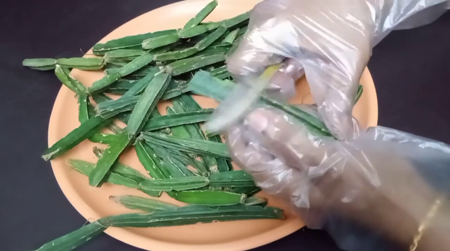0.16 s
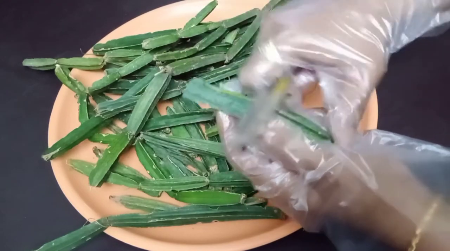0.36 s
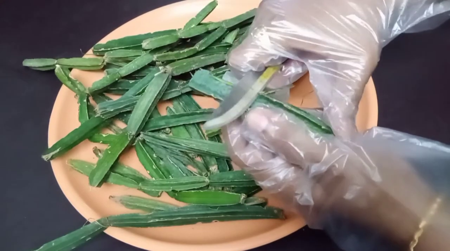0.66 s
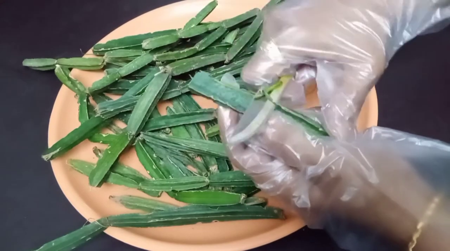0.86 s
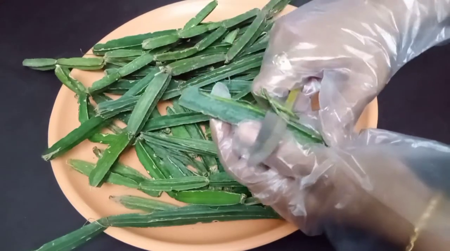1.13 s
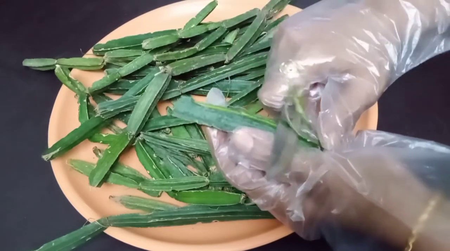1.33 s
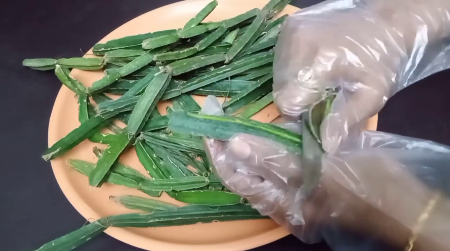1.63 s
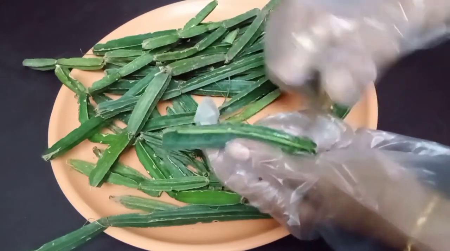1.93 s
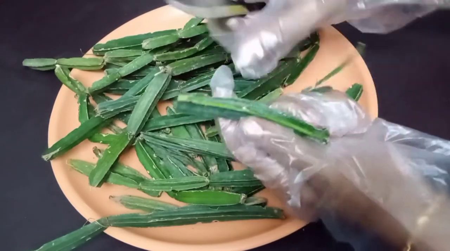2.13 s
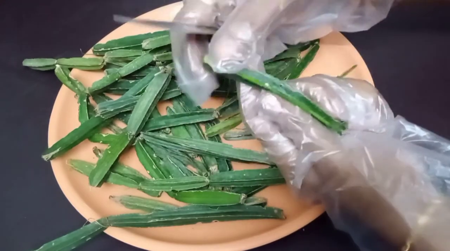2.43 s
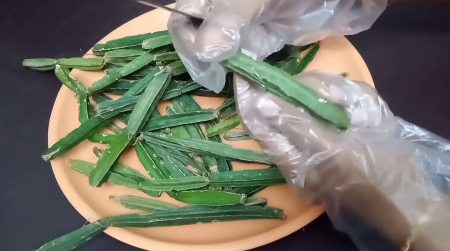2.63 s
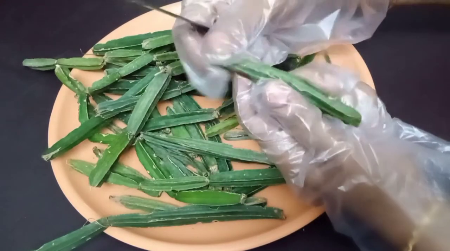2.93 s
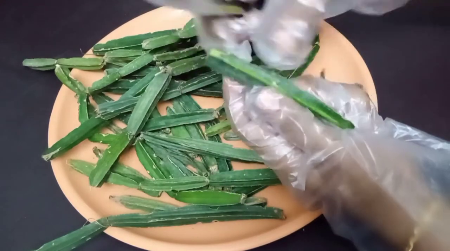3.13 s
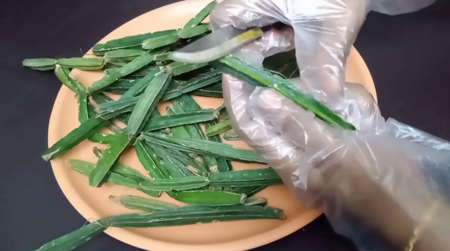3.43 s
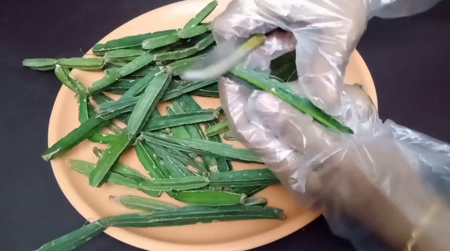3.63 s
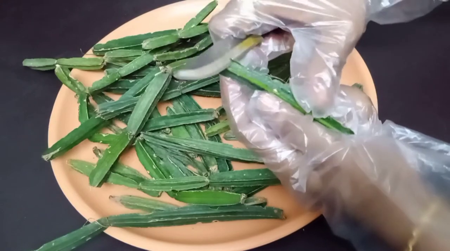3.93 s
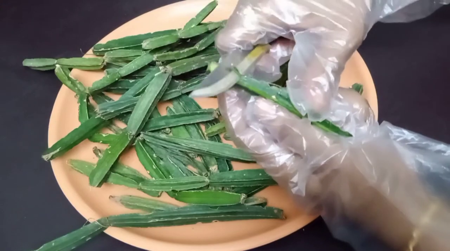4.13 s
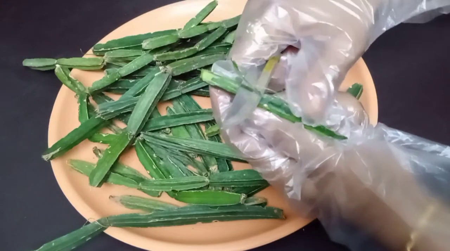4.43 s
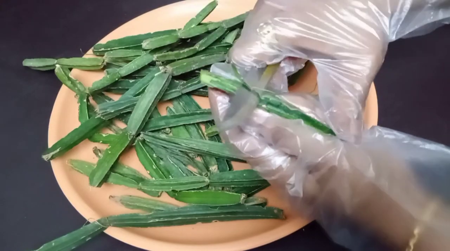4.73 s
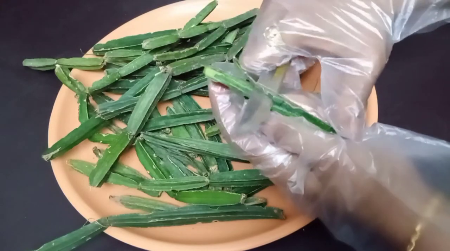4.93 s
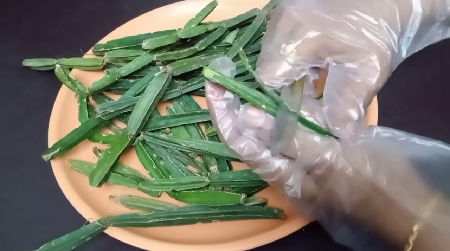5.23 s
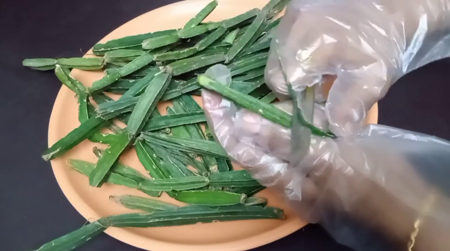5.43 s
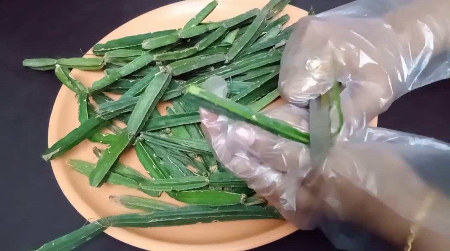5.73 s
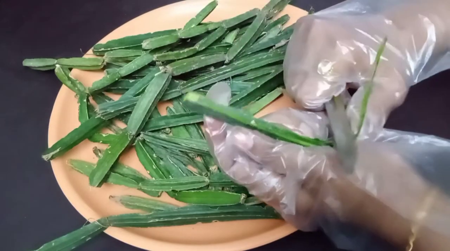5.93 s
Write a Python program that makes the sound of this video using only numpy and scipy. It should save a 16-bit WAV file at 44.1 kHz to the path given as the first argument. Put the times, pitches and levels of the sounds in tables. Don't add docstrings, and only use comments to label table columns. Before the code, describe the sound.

Close to a small phone microphone, thin plastic gloves crinkle continuously. A soft, hollow table knock comes right at the start, then uneven clumps of crackle with crisp snaps and faint stem rubs. It grows busiest around two to three seconds, quiets, then returns in shorter tugs. A small quiet kitchen hums very faintly behind.

```python
import sys
import numpy as np
from scipy import signal
from scipy.fft import rfft, irfft
from scipy.io import wavfile
from scipy.ndimage import uniform_filter1d

SR = 44100
rng = np.random.default_rng(int(sys.argv[2]) if len(sys.argv) > 2 else 0)


def pcm_store(signal):
    levels = np.round(np.clip(np.atleast_2d(signal), -1, 1) * 32767)
    wavfile.write(sys.argv[1], SR, levels.astype(np.int16).T)


def volts(x):
    e = np.asarray(x, float) / 20
    return 10 ** e


N = 267246

# [t/s, crinkle level/dB, palm fold/dB]
HAND_WORK = [(0.0, -39, 11.5), (0.44, -43, -14.5), (0.59, -47, -3.5), (0.95, -43, -6), (1.45, -42.5, -3),
             (1.6, -42, 5.5), (1.95, -40, 5.5), (2.4, -38.5, 3.2), (3.0, -38.5, -5.5), (3.4, -43.5, 0),
             (3.46, -47.5, -5.5), (3.85, -43, -16), (4.44, -43.5, -24), (4.55, -38, -1.5), (4.9, -47.5, 0),
             (5.36, -44.5, -7.5), (5.45, -43.5, 2.5), (6.06, -41.5, 2.5)]
# [start t/s, hold/s, level/dB, palm fold/dB]
FIRST_EDGE_GRIPS = [(0.0, 0.049, -48.5, 13), (0.194, 0.09, -36, 7), (0.343, 0.096, -37.5, 4.5),
                    (0.413, 0.041, -36, 5), (0.534, 0.022, -45.5, 3.5), (0.663, 0.075, -39.5, -11),
                    (0.826, 0.038, -38.5, 2.8), (0.991, 0.016, -37, -3), (1.079, 0.042, -42.5, 6.5),
                    (1.148, 0.058, -46, 6.5), (1.306, 0.085, -35.5, 0.6), (1.51, 0.11, -37, -2),
                    (1.643, 0.091, -36, -1), (1.757, 0.051, -40, 8), (1.934, 0.053, -32, -10),
                    (2.015, 0.037, -31, -1.5), (2.071, 0.056, -32.5, -2), (2.125, 0.028, -31.5, 1),
                    (2.416, 0.07, -38.5, 4.4), (2.573, 0.094, -37, -0.5), (2.787, 0.055, -34.5, -12),
                    (2.849, 0.065, -37.5, 0.8), (2.941, 0.13, -37.5, 6), (3.103, 0.063, -33.5, 4),
                    (3.19, 0.071, -38, 1), (3.299, 0.059, -37.5, 4)]
# [start t/s, hold/s, level/dB, palm fold/dB]
SECOND_EDGE_GRIPS = [(3.488, 0.14, -42, -7.5), (3.67, 0.09, -41.5, -4.5), (3.9, 0.042, -50, 6),
                     (3.995, 0.035, -43, 1), (4.04, 0.063, -43.5, 3.5), (4.179, 0.081, -45, -0.5),
                     (4.239, 0.051, -43, 2.5), (4.308, 0.085, -45, 3), (4.484, 0.063, -32, -2.5),
                     (4.562, 0.07, -40.5, 7.5), (4.648, 0.062, -41, 0), (4.754, 0.017, -38.5, -11),
                     (4.804, 0.026, -38, -2.5), (4.893, 0.06, -42.5, -1), (5.013, 0.049, -42, 0),
                     (5.077, 0.032, -44.5, -5), (5.134, 0.082, -39, -13), (5.259, 0.079, -39.5, -16),
                     (5.386, 0.099, -36.5, -4), (5.468, 0.069, -40.5, 4), (5.618, 0.058, -35, 3.7),
                     (5.75, 0.025, -59, 2), (5.87, 0.068, -38, -1.5), (6.039, 0.03, -52, 11)]
GRIP_RISE_S, GRIP_RELEASE_S, GRIP_ARCH_DB = 0.0099, 0.016, 0.5
# [level/dB, share of the palm fold/1]
FOLD_SIZES = [
    (-3.5, 0.34),
    (-8, 0.3),
    (-17.5, 1.2),
    (-22, 0.97),
]
FOLD_LIMITS = 1400, 2600, 5000
# [f/Hz, density/dB per Hz]
FILM_COLOUR = [(410, -38.5), (700, -26), (873, -25), (1100, -18.5), (1540, -14), (2770, -8.5), (3190, -9),
               (3580, -7.5), (5020, -5.5), (6940, 2), (7500, -1.5), (9350, -21.5), (11500, -19.5),
               (14700, -7.5), (15500, -14)]
# [t/s, peak level/dB, patch f/Hz, length/ms]
FIRST_EDGE_SNAPS = [(.2065, -22, 5400, 2), (.264, -20, 3800, 1.9), (.3617, -22, 6900, 1.1),
                    (.5282, -28, 6500, 3.9), (.6972, -28, 5900, 1.4), (.7859, -25, 3100, 2.2),
                    (.8407, -25, 5700, 1.7), (1.0241, -24, 4000, 1.6), (1.0768, -24, 4700, 1.1),
                    (1.0946, -24, 7800, 2.4), (1.187, -24, 6900, 2.1), (1.3035, -25, 6200, 1.3),
                    (1.496, -20, 6900, 1.2), (1.6025, -22, 7400, 3), (1.6606, -20, 7100, 2.8),
                    (1.7839, -19, 1700, 2.4), (1.8157, -21, 6900, 1.9), (1.9785, -20, 7100, 2.2),
                    (2.0208, -17, 6400, 1.4), (2.0332, -14, 6400, 1.8), (2.1371, -18, 7100, 3),
                    (2.5509, -21, 12900, 1.5), (2.5964, -21, 7100, 2.9), (2.6319, -21, 4100, 1.2),
                    (2.7774, -15, 5500, 1.2), (2.8161, -21, 6400, 1.7), (2.9131, -21, 7600, 2.4),
                    (2.948, -18, 5700, 1.1), (3.3608, -22, 6500, 2.7), (3.3935, -26, 6700, 1.1)]
# [t/s, peak level/dB, patch f/Hz, length/ms]
SECOND_EDGE_SNAPS = [(3.5036, -30, 6700, 4.1), (3.5507, -25, 4700, 2.1), (3.6007, -26, 4000, 1.7),
                     (3.6872, -25, 7200, 2.1), (3.7654, -26, 6700, 1.4), (3.9004, -30, 7600, 1.2),
                     (3.923, -21, 4500, 2.4), (3.9909, -29, 6900, 3.7), (4.0804, -26, 6400, 1.9),
                     (4.1973, -27, 6400, 3.5), (4.3463, -25, 2800, 2.9), (4.4446, -31, 6900, 2.2),
                     (4.513, -15, 7200, 2.1), (4.5222, -13, 7100, 1.1), (4.6052, -19, 6700, 2.4),
                     (4.6134, -20, 4100, 1.8), (4.7644, -21, 4300, 1.9), (4.8185, -23, 4700, 1.9),
                     (5.0119, -25, 13600, 1.1), (5.084, -26, 7100, 1.4), (5.1412, -26, 4800, 1.2),
                     (5.1563, -24, 7800, 1.3), (5.2934, -27, 5200, 1.5), (5.3437, -27, 11700, 2.7),
                     (5.4124, -21, 12400, 2.1), (5.6405, -18, 6500, 2.3), (5.6861, -19, 7200, .9),
                     (5.761, -25, 6500, 1.2), (5.7717, -23, 4700, 1.8), (6.0507, -25, 4800, 2.8)]
STRAY_COUNT = 300
STRAY_OVER_DB, STRAY_SPREAD_DB = 9, 4
# [t/s, level/dB, f/Hz, length/s]
STEM_RUBS = [(.005, -41.5, 1700, 0.028), (0.128, -64, 1380, 0.019), (0.347, -48.5, 1120, 0.091),
             (0.402, -43.5, 1160, 0.072), (1.154, -54.5, 1290, 0.11), (1.581, -54, 1050, 0.17),
             (2.122, -43.5, 1126, 0.057), (2.668, -63.5, 1390, 0.39), (3.131, -55.5, 660, 0.064),
             (3.253, -51.5, 1010, 0.042), (3.473, -64.5, 1950, 0.13), (3.516, -64, 2800, 0.26),
             (3.673, -58.5, 1044, 0.095), (4.676, -51.5, 980, 0.045), (5.128, -52, 1270, 0.066),
             (5.26, -58.5, 1415, 0.12), (5.386, -45.5, 1056, 0.074), (5.924, -55.5, 1120, 0.034),
             (0.28, -52, 950, 0.025), (.425, -50.5, 610, 0.045), (0.833, -59.5, 620, .04),
             (1.327, -52, 880, 0.065), (1.97, -61, 800, .06), (1.99, -61, 496, .06),
             (2.948, -63, 617, 0.039), (3.33, -59, 820, 0.044), (3.37, -59.5, 1060, 0.037),
             (4.497, -62, 610, 0.098), (5.616, -61, 710, 0.094), (1.447, -65, 1330, 0.074)]
# [f/Hz, level/dB, t60/s]
TABLE_MODES = [(176, -21, 0.091), (335.3, -30.5, 0.3), (418, -23, 0.073), (488, -26, 0.088),
               (255, -35, 0.16), (610, -36, 0.16), (669, -40, 0.11), (118, -26, 0.047)]
KNOCK_S, KNOCK_RISE_S = 0.0086, 0.005
# [t/s, peak level/dB, f/Hz]
WRIST_BUMPS = [
    (0.839, -58.5, 128),
    (1.349, -61.5, 60),
    (2.129, -63, 124),
    (3.211, -64, 70.0),
    (3.365, -66, 68),
    (1.53, -77, 65),
    (1.84, -70, 62),
    (1.97, -71, 70),
]
# [f/Hz, density/dB per Hz]
ROOM_HUM = [(18, -47), (30, -20), (91, -16.5), (119, -5.5), (150, -10), (168, -3.5), (217, -3.5), (292, -7),
            (378, -6), (481, -13.5), (900, -16.5), (1170, -18), (1980, -120)]
HUM_DB = -67.5
# [f/Hz, level/dB]
APPLIANCE_TONES = [(177.6, -76.5), (226.1, -74.5), (263.8, -80.5), (376.8, -80.5)]
# [f/Hz, threshold/dB per bin]
GATE_THRESHOLD = [(100, -54.5), (450, -48), (600, -67.5), (1000, -68.5), (2500, -71.5), (4000, -70),
                  (6000, -101)]
GATE_DEPTH_DB = -6


def gloves():
    colour = causal(FILM_COLOUR)
    film = signal.oaconvolve(patchy(crackle(), patchy_db=2.5), colour)[:N]
    hz, spectrum = np.fft.rfftfreq(N, 1 / SR), rfft(film)
    low, middle, high = (1 / (1 + (hz / edge) ** 8) for edge in FOLD_LIMITS)
    bands = 1 - high, high - middle, middle - low, low
    out = np.zeros(N)
    for band, (db, share) in zip(bands, FOLD_SIZES):
        out += evened(irfft(spectrum * band, N)) * volts(db) * hands(share)
    snaps = list(FIRST_EDGE_SNAPS) + list(SECOND_EDGE_SNAPS) + strays(hands(0))
    for (at, db, pitch, ms), noise in zip(snaps, rng.standard_normal((len(snaps), 400))):
        dulled = signal.lfilter([1, .15], [1], noise)
        sound = signal.fftconvolve(snap(dulled, pitch, 0.00075 * ms), colour)
        add(out, at, volts(db) * sound / abs(sound).max())
    return out


def hands(share):
    t = np.arange(0, N, 32) / SR
    at, db, palm_db = np.transpose(HAND_WORK)
    grips = list(FIRST_EDGE_GRIPS) + list(SECOND_EDGE_GRIPS)
    start, hold, grip_db, grip_palm_db = np.transpose(grips)[:, :, None]
    rise = np.clip((t - start) / GRIP_RISE_S, 0, 1) ** 2
    release = np.exp(-np.maximum(t - start - hold, 0) / GRIP_RELEASE_S)
    arch = 2 * np.sin(np.pi * np.clip((t - start) / hold, 0, 1)) - 1.23
    shape = rise * release * volts(GRIP_ARCH_DB * arch) ** 2
    work_power = volts(np.interp(t, at, db + share * palm_db)) ** 2
    grip_power = (volts(grip_db + share * grip_palm_db) ** 2 * shape).sum(0)
    return np.interp(np.arange(N) / SR, t, np.sqrt(work_power + grip_power))


def crackle(per_s=2600, spread_db=2.0, clump_db=0.0, rustle_db=-11):
    clump = volts(clump_db * drift(N, 120) + 1.42 * drift(N, 600))
    size = volts(spread_db * np.minimum(rng.exponential(1, N), 3.0))
    size = size * (rng.random(N) < per_s / SR)
    kind, out = rng.integers(0, 24, N), np.zeros(N)
    for k, hz in enumerate(np.geomspace(1200, 14000, 24)):
        grain = snap(rng.standard_normal(128), hz, 0.00077, ring=0.46)
        out += signal.oaconvolve(size * (kind == k), grain / np.linalg.norm(grain))[:N]
    return clump * (evened(out) + volts(rustle_db) * rng.standard_normal(N))


def snap(noise, hz, length, ring=.55):
    t = np.arange(len(noise)) / SR
    u = t / max(length, .0002)
    return u ** 0.31 * np.exp(-u ** 1.47) * (noise + ring * np.sin(2 * np.pi * hz * t))


def strays(level):
    when, size, pitch, length = rng.random((STRAY_COUNT, 4)).T
    around_db = 20 * np.log10(level[(when * N).astype(int)])
    db = around_db + STRAY_OVER_DB + STRAY_SPREAD_DB * (2 * size - 1)
    return list(zip(when * N / SR, db, 2800 + 5000 * np.sqrt(pitch), 0.38 + 3.55 * length))


def patchy(x, patchy_db):
    hz, t, z = signal.stft(x, SR, nperseg=512)
    patches = rng.standard_normal((len(t), len(hz))).T
    patches = evened(uniform_filter1d(uniform_filter1d(patches, 8, 0), 6, 1))
    depth = patchy_db * np.clip(2500 / (hz + 300), .4, 2)[:, None]
    return signal.istft(z * volts(depth * patches), SR, nperseg=512)[1][:N]


def stem(width_hz=85):
    out = np.zeros(N)
    r = np.exp(-np.pi * width_hz / SR)
    for (at, db, hz, length), noise in zip(STEM_RUBS, rng.standard_normal((len(STEM_RUBS), 12000))):
        hollow = signal.lfilter([1, -1], [1, -2 * r * np.cos(2 * np.pi * hz / SR), r * r], noise)
        u = np.arange(12000) / SR / length
        add(out, at, volts(db) * evened(hollow) * np.minimum(5.3 * u, 1) * np.exp(-u ** 3))
    return out


def table():
    out, t = np.zeros(N), np.arange(12000) / SR
    rise = 1 - np.exp(-(t / KNOCK_RISE_S) ** 2)
    ring = rise * sum(volts(db - 60 * t / t60) * np.sin(2 * np.pi * hz * t) for hz, db, t60 in TABLE_MODES)
    for later_s, db in (0, -5), (.009, -5), (.028, -7.5), (.07, -17):
        add(out, KNOCK_S + later_s, volts(db) * ring)
    push_rise = 1 - np.exp(-t / 0.014)
    for at, db, hz in WRIST_BUMPS:
        add(out, at, volts(db + 13.5 - 60 * t / 0.2) * push_rise * np.sin(2 * np.pi * hz * t))
    return out


def walls(x, t60=0.19):
    t = np.arange(9000) / SR
    echoes = rng.choice([-1., 1.], 9000) * (rng.random(9000) < .06)
    tail = echoes * volts(-60 * t / t60) * (t > .002)
    return signal.fftconvolve(x, tail / np.linalg.norm(tail))[:N]


def kitchen():
    noise = rfft(rng.standard_normal(N)) * volts(read(ROOM_HUM, np.fft.rfftfreq(N, 1 / SR)))
    t = np.arange(N) / SR
    tones = np.zeros(N)
    for hz, db in APPLIANCE_TONES:
        tones += volts(db - 1.0) * np.sin(2 * np.pi * hz * t + 1.6 * drift(N, 9000))
    hum = volts(HUM_DB - 1.54) * evened(irfft(noise, N))
    return volts(-GATE_DEPTH_DB) * (hum + tones)


def suppress(x):
    hz, t, z = signal.stft(x, SR, nperseg=1024, noverlap=768)
    power = uniform_filter1d(uniform_filter1d(abs(z) ** 2, size=3, axis=0), size=13, axis=1)
    over_db = 10 * np.log10(abs(power) + 1e-14) - read(GATE_THRESHOLD, hz)[:, None]
    shut = 1 / (1 + np.exp(np.clip(over_db / 0.53, -30, 30)))
    return signal.istft(z * volts(GATE_DEPTH_DB * shut), SR, nperseg=1024, noverlap=768)[1][:N]


def evened(x):
    return x / np.sqrt(np.mean(x ** 2) + 1e-20)


def read(points, hz):
    f, value = np.transpose(points)
    return np.interp(np.log(hz + 1), np.log(f + 1), value)


def add(mix, s, sound):
    part = mix[round(s * SR):][:len(sound)]
    part += sound[:len(part)]


def causal(points):
    level_db = read(points, abs(np.fft.fftfreq(4096, 1 / SR)))
    log_gain = np.log(volts(np.maximum(level_db, -100)))
    return np.fft.ifft(np.exp(log_gain - 1j * signal.hilbert(log_gain).imag)).real[:1024]


def drift(size, smooth):
    return evened(uniform_filter1d(uniform_filter1d(rng.standard_normal(size), smooth), smooth))


def scene():
    near = gloves() + stem()
    return (near + volts(-11.5) * walls(near) + table() + kitchen())[None]


def roll_off(x):
    return signal.sosfilt(signal.butter(12, 16810, fs=SR, output="sos"), x)


def record(dry):
    band_limit = signal.firwin(801, 15780, window=("kaiser", 10), fs=SR)
    mix = signal.oaconvolve(suppress(dry[0]), band_limit, "same")[None]
    return roll_off(mix)


dry = scene()
out = record(dry)
pcm_store(out)
```